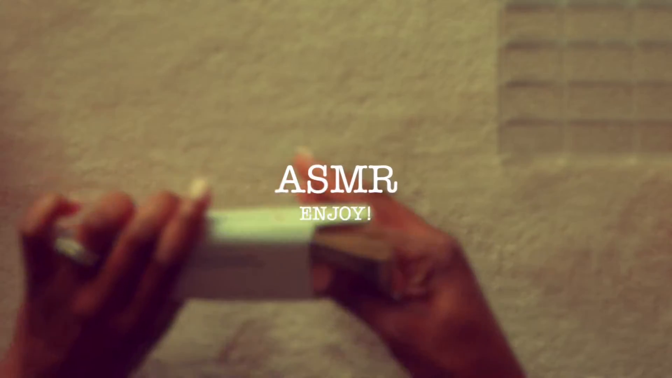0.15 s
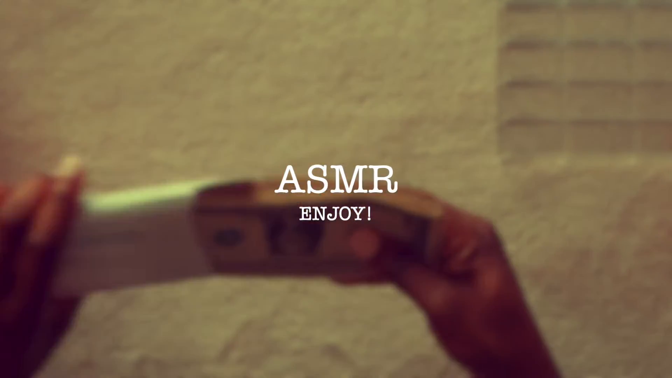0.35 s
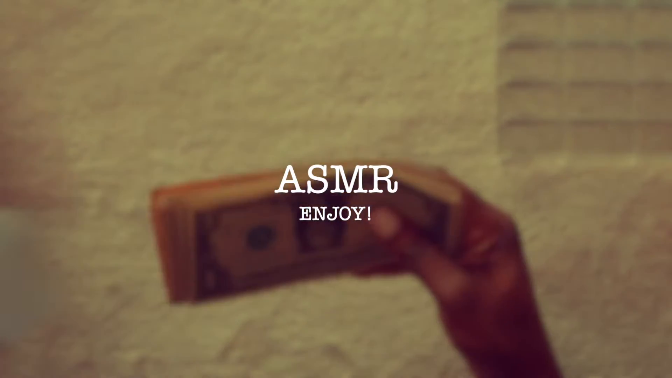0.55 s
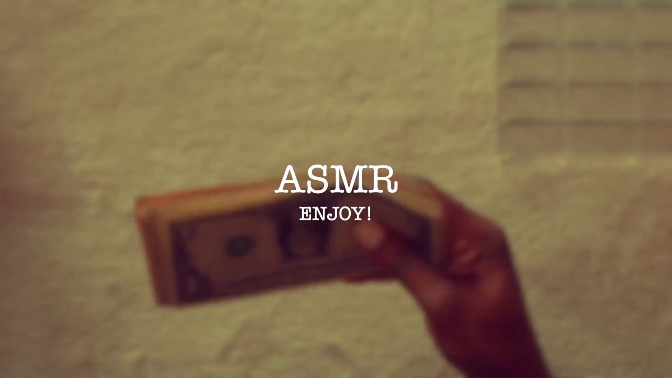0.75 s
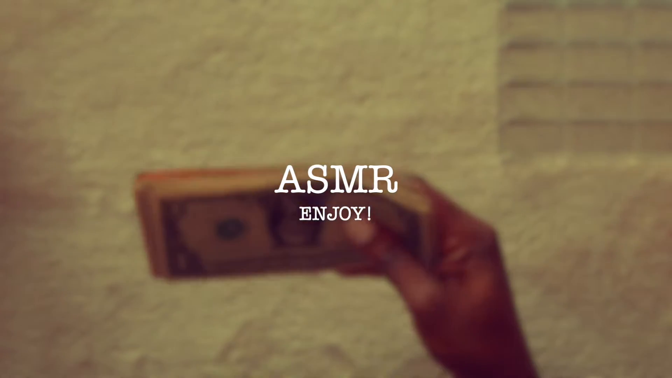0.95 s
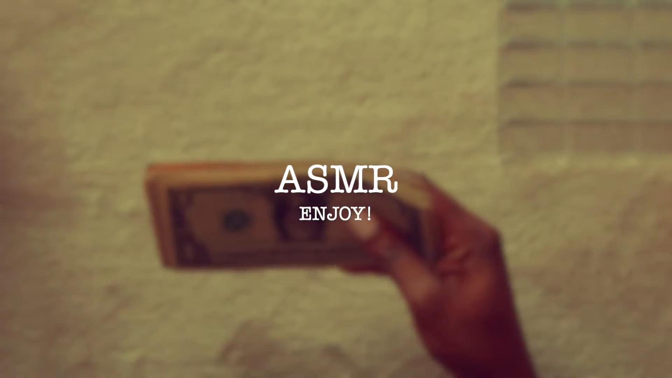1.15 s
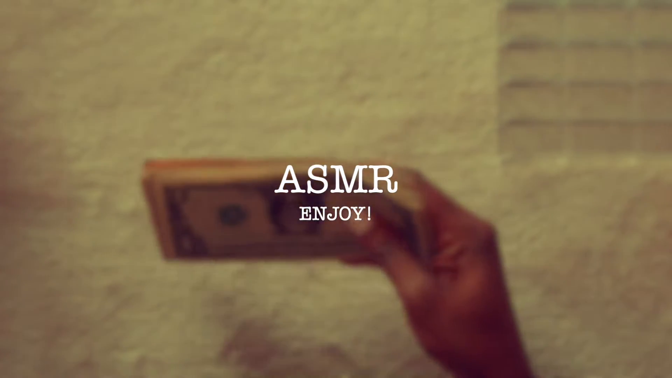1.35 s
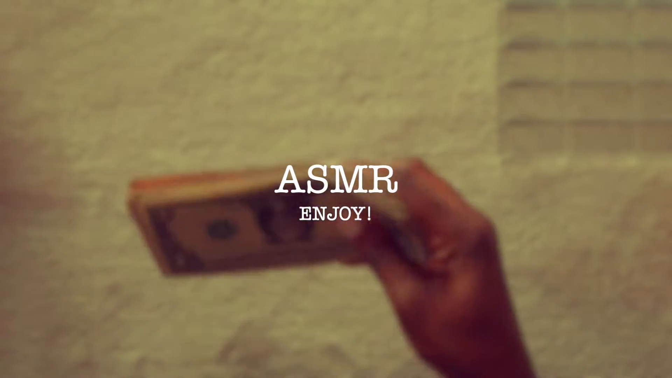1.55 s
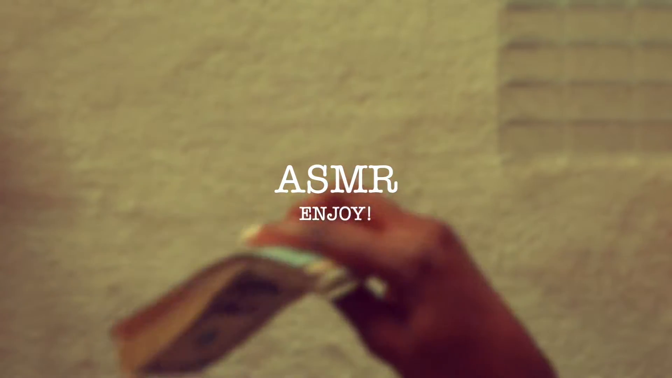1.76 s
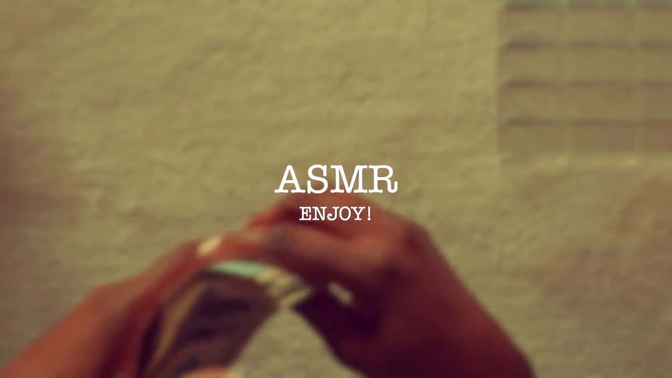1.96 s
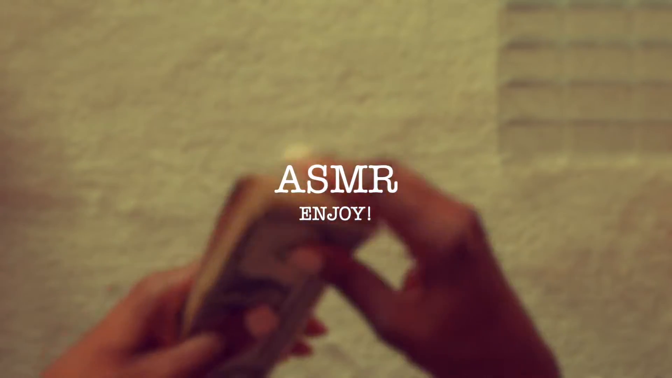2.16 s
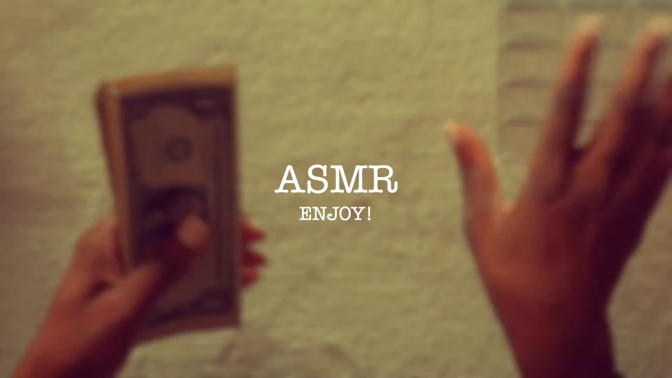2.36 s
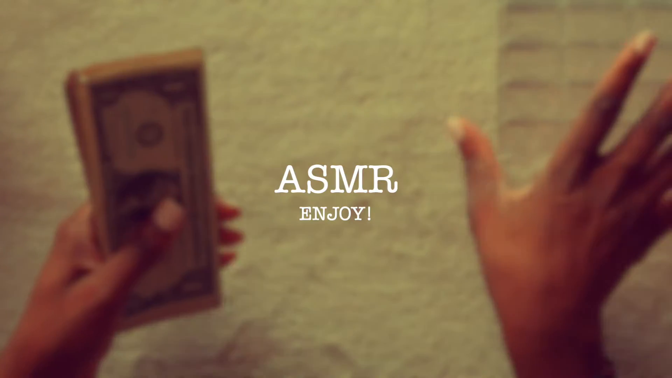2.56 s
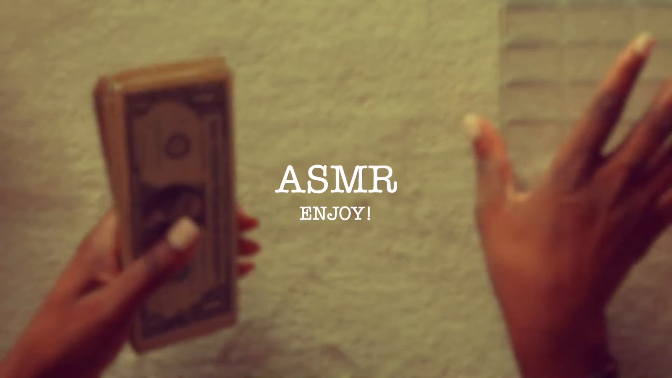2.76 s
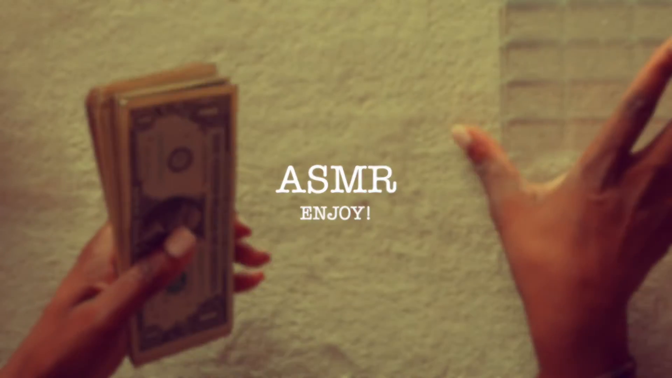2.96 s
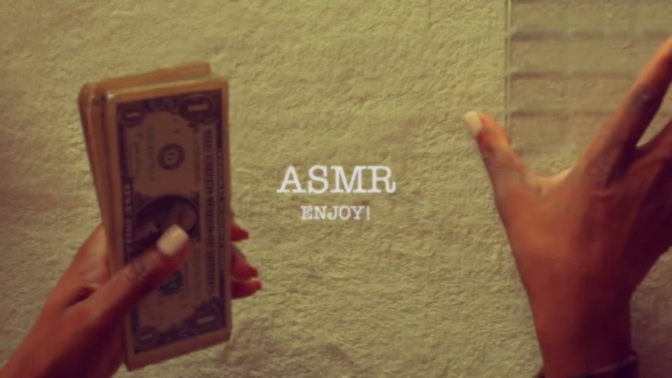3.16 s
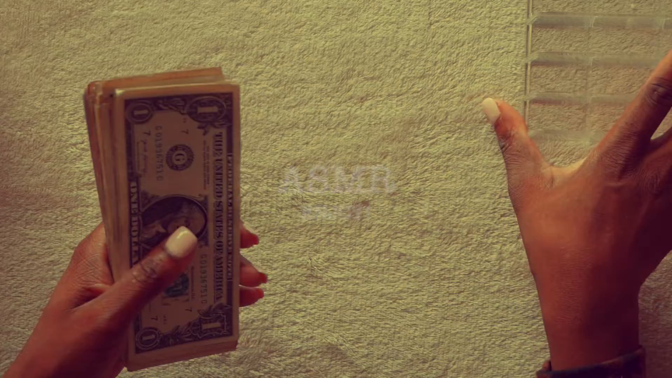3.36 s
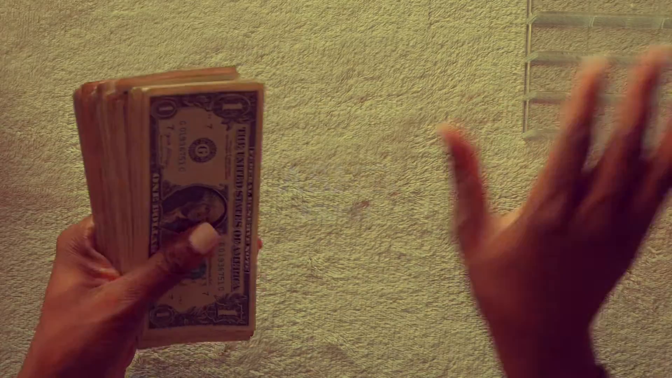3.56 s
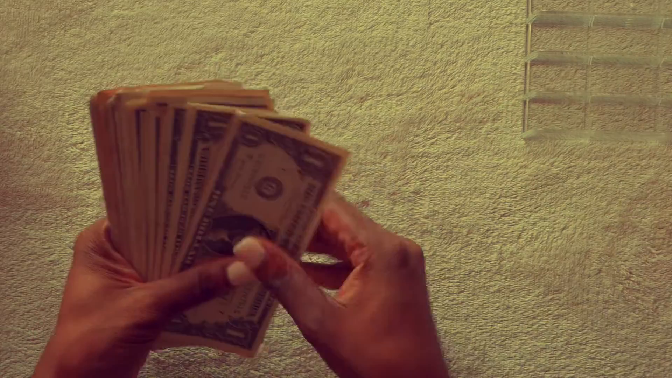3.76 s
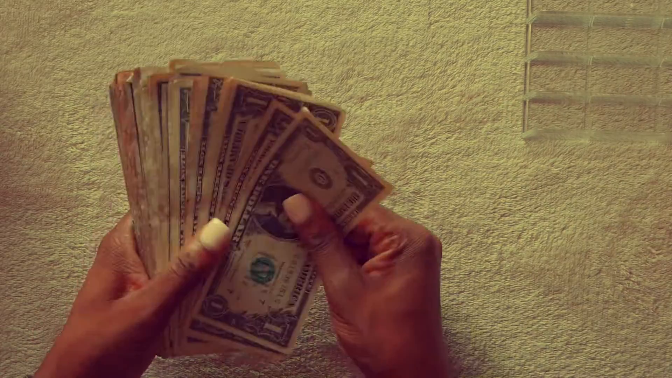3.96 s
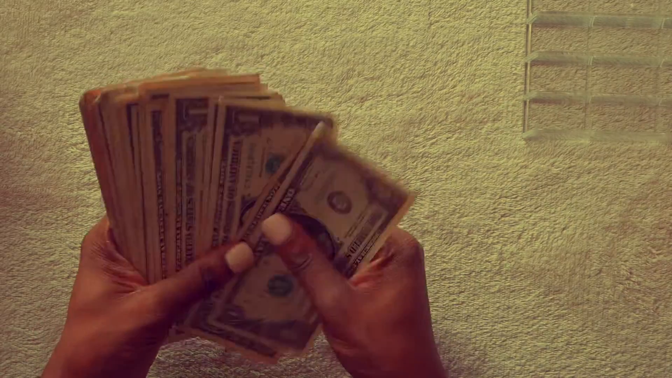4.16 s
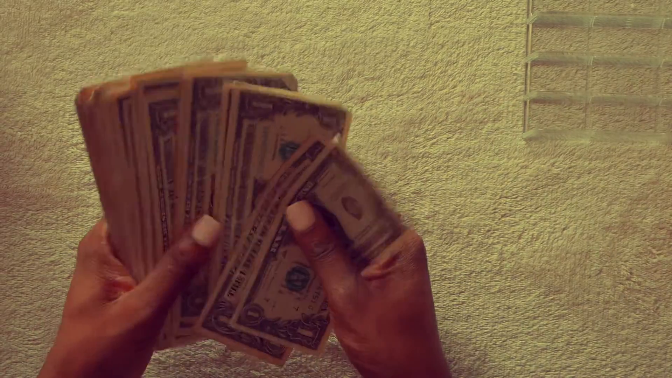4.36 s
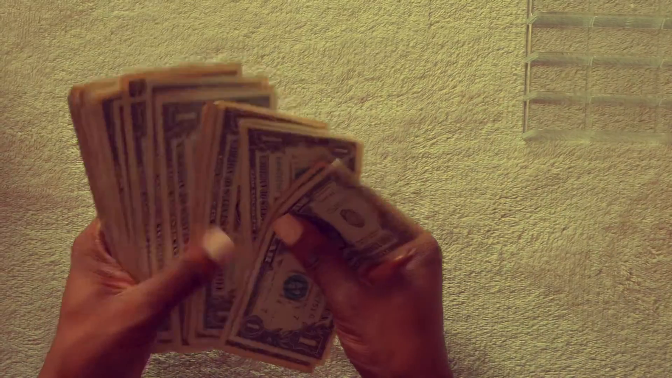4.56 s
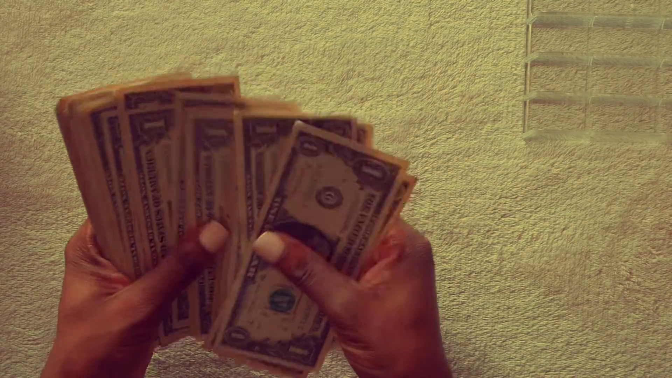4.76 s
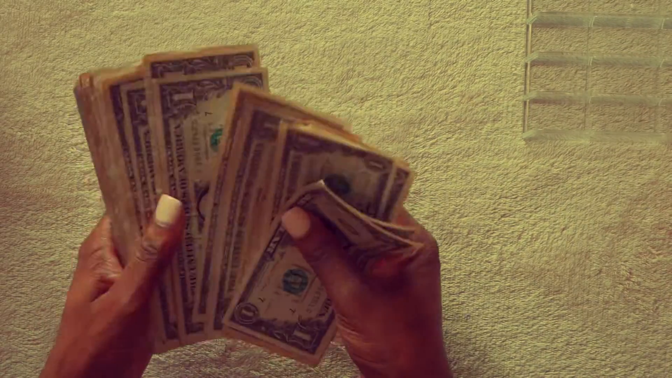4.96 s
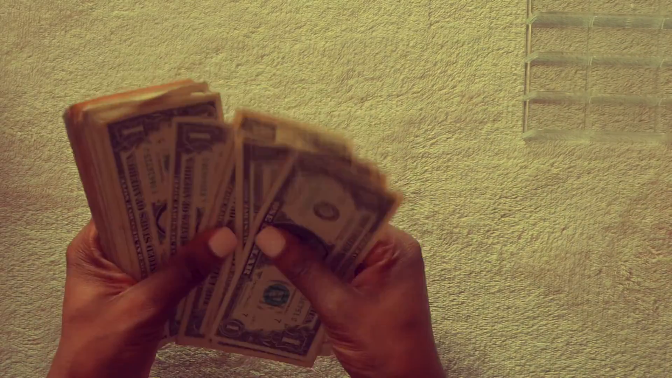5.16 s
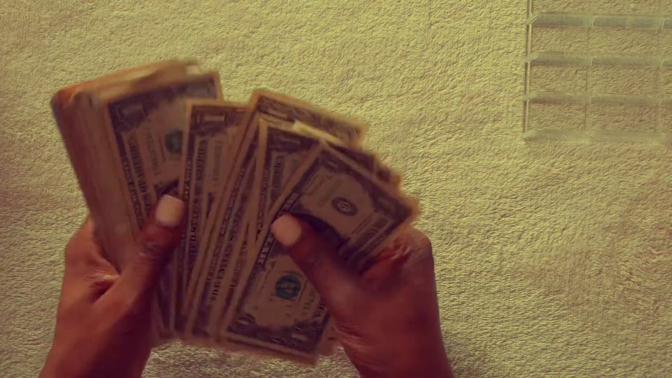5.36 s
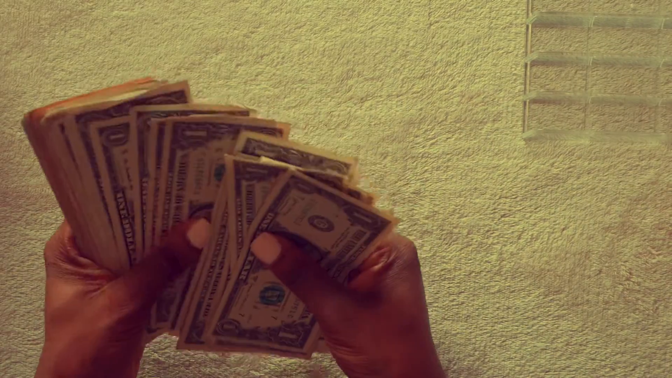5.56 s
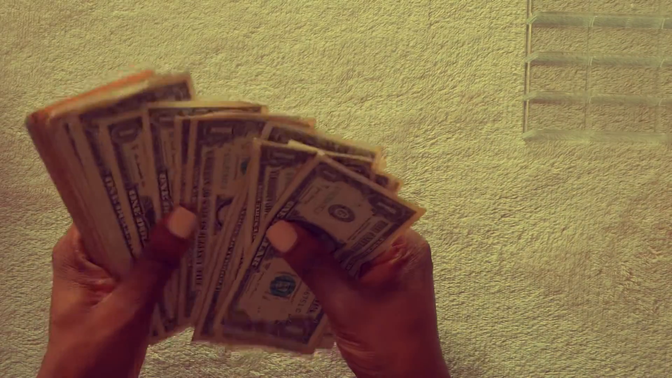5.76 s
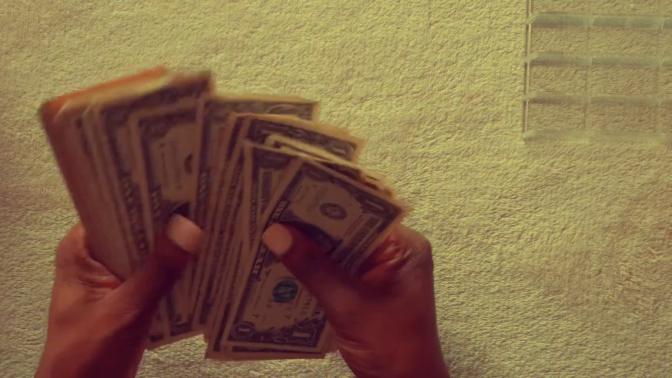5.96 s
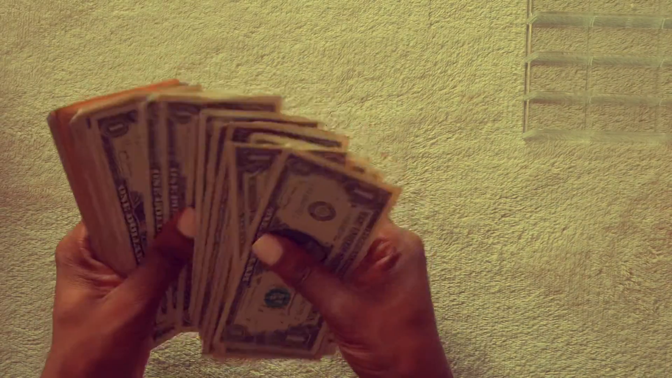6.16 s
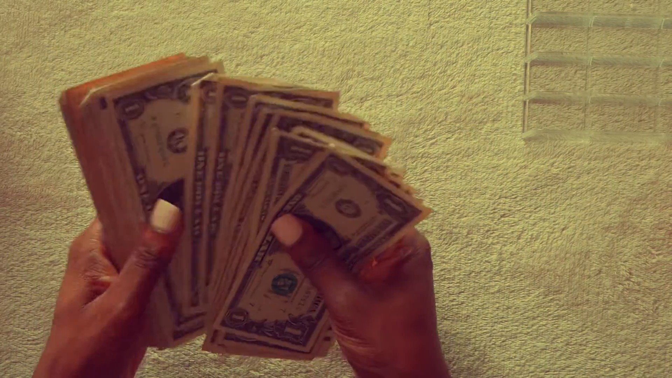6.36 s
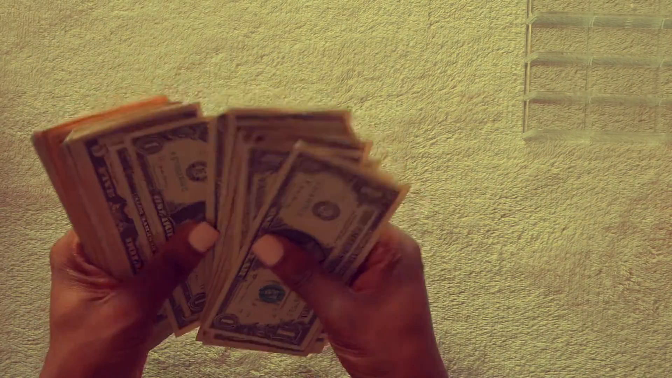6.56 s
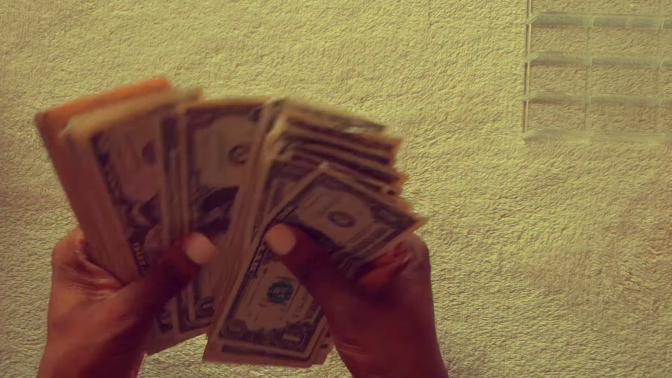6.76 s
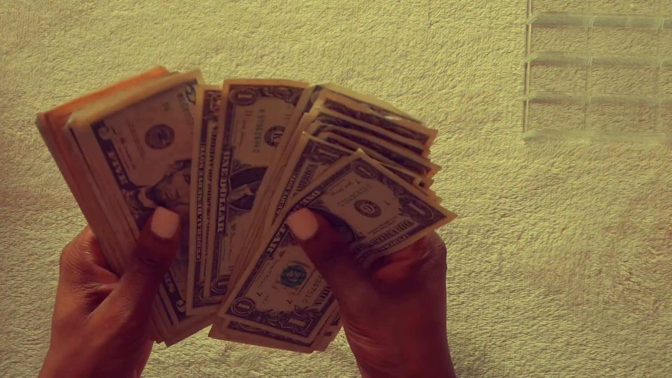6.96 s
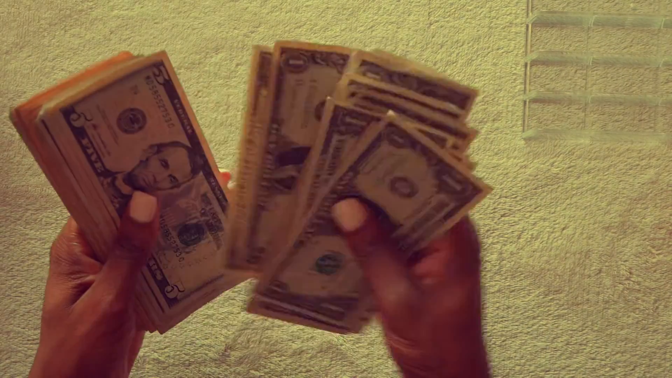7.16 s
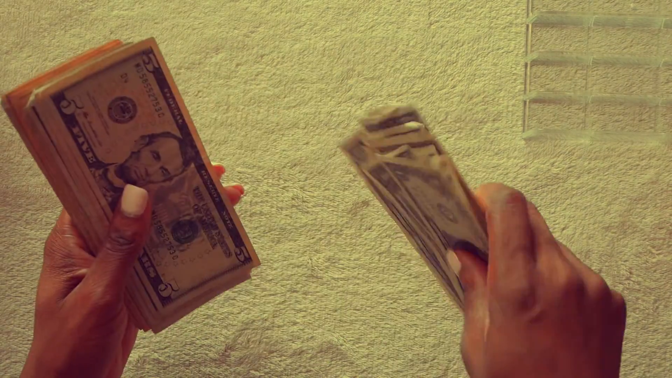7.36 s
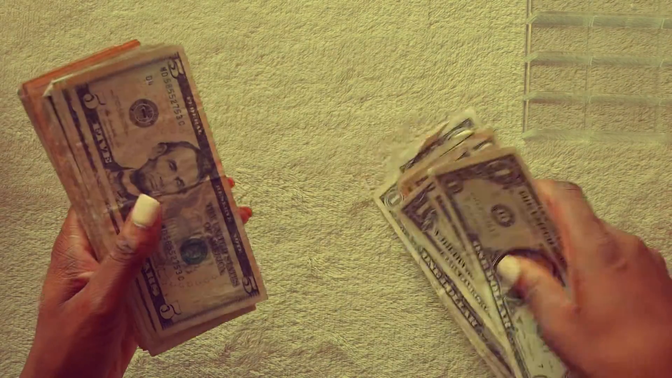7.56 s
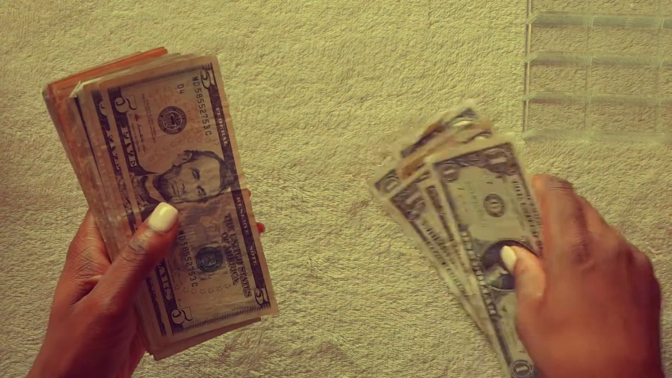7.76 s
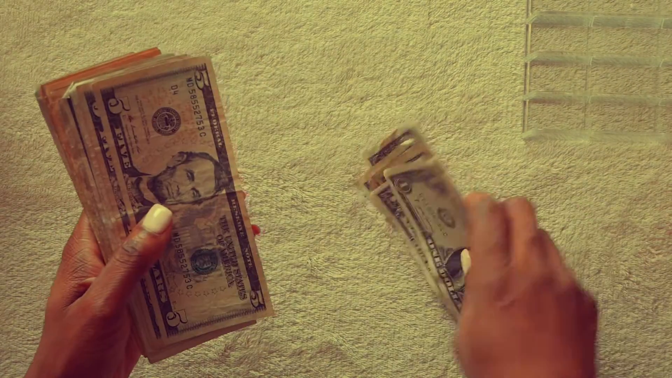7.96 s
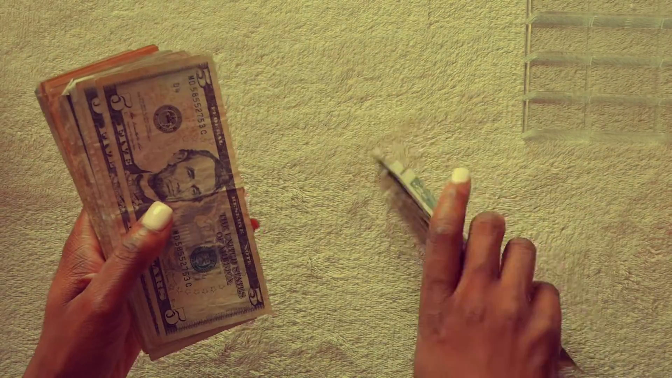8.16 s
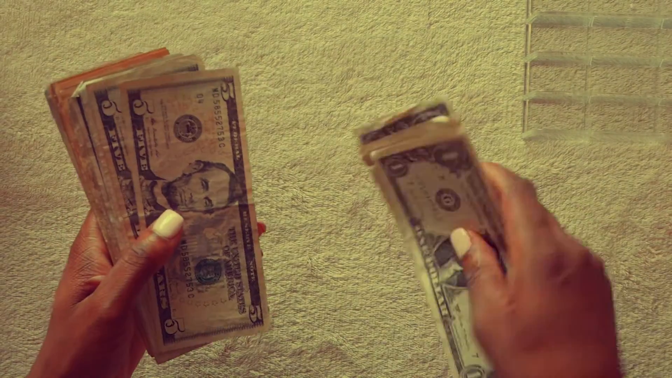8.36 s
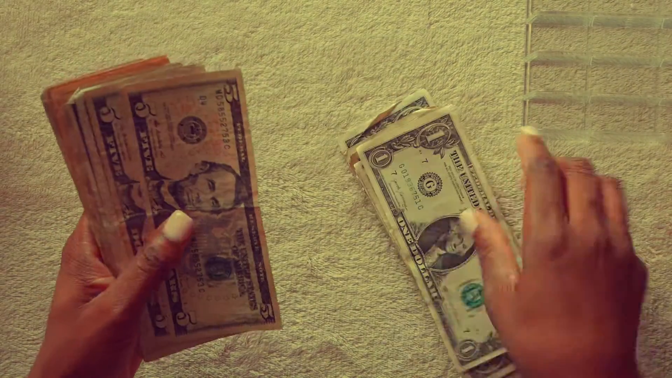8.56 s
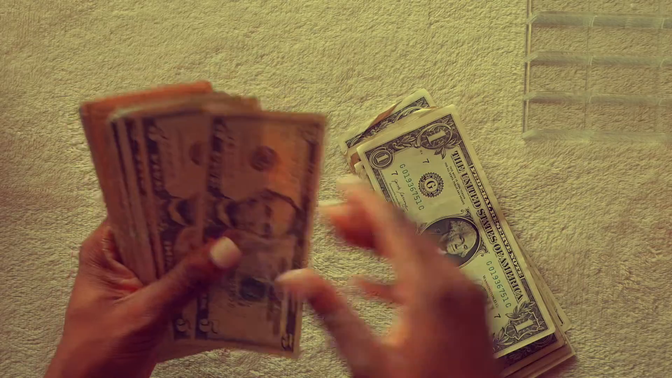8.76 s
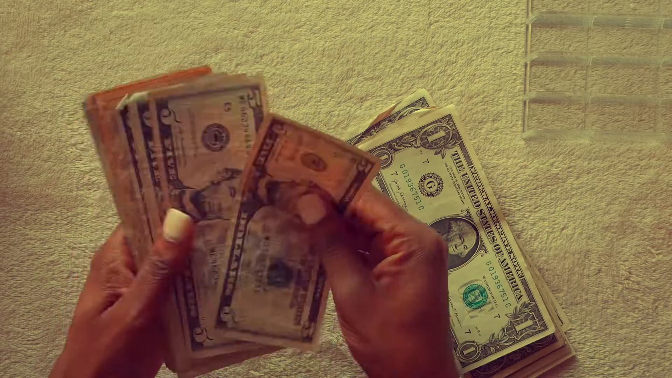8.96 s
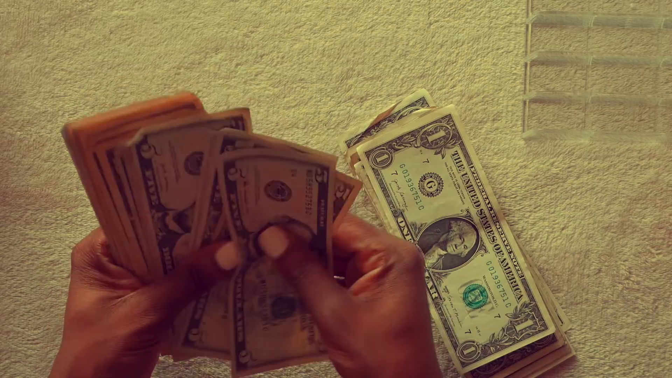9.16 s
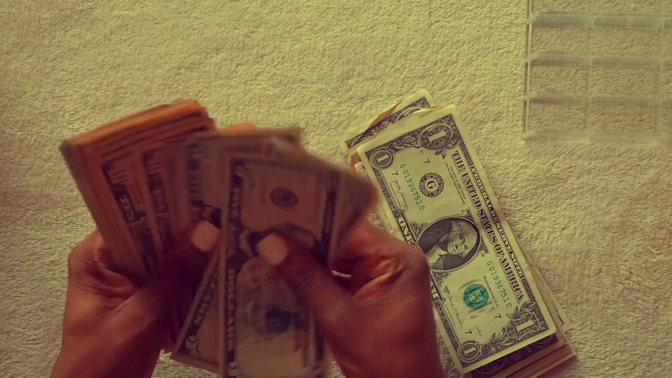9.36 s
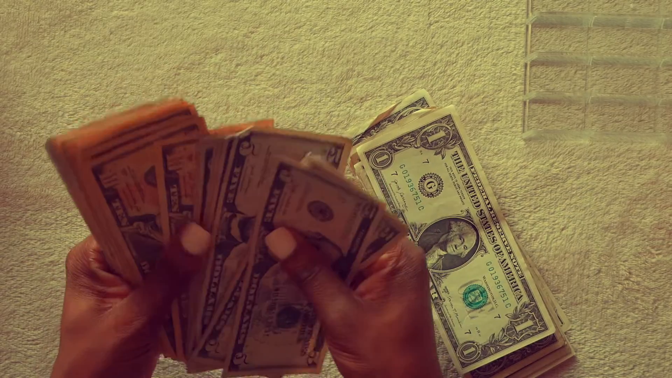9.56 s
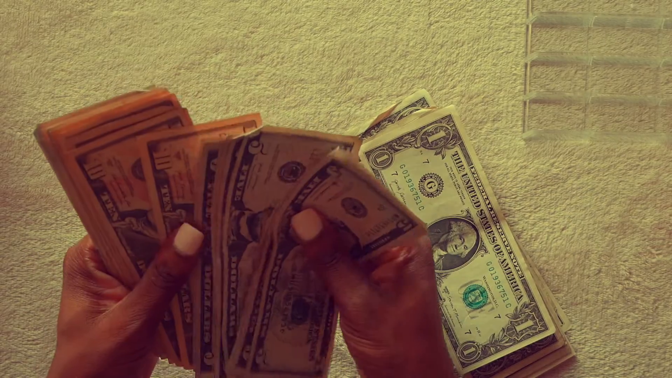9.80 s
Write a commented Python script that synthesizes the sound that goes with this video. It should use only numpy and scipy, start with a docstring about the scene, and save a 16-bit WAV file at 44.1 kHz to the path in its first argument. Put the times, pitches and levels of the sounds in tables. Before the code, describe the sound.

Extremely close, dry handling of paper money, the same in both channels, over a faint low room hum. From 0 to 0.6 seconds, a wad is dragged from an envelope: a loud, bright, stuttering scrape, hard crackling snaps, soft thumps, and a hollow papery pop near 0.58. It falls away quickly; until 2 seconds only faint brushes remain. At 2.0-2.3 a gentle rustle and air push, then a few faint nail rattles and a cluster of tiny bright ticks at 2.6-3.0. From 3.9 to 6.9, notes are fanned and thumbed: irregular short swishes, fluttering sheets, crisp creases, a stronger snap at 5.7, muffled low taps. From 7 to 8.5 softer, sparser sliding with low air movement. At 8.63 a sharp, bright clack rattles the stiff edges, with a short room answer. From 8.9 to the end, brisker hissing strokes, snaps and breath-like air bumps.

```python
"""A wad of paper banknotes, pulled from an envelope, then fanned and thumbed close to a mono microphone.
Sliding sheets are stuttering filtered noise; creases snap as short noise bursts with a ring and a shove.
A nail rattles the wad's edge resonances, taps are sagging low tones, and moving paper pushes slow air
at the microphone. Snaps and clacks get a faint room answer; a quiet hum lies behind; loud peaks flatten."""
import sys
import numpy as np
from scipy import signal
from scipy.fft import rfft, irfft, next_fast_len
from scipy.io import wavfile
from scipy.ndimage import uniform_filter1d, map_coordinates

SR = 44100
rng = np.random.default_rng(int(sys.argv[2]) if len(sys.argv) > 2 else 0)


def generate_wav(signal):
    """Clip the signal to [-1, 1] and save it as 16-bit WAV at the path in sys.argv[1]."""
    frames = np.transpose(np.atleast_2d(signal))
    scaled = np.clip(frames, -1, 1) * 32767
    pcm = np.round(scaled).astype(np.int16)
    wavfile.write(sys.argv[1], SR, pcm)


N = 433503  # samples

# Steady contact between the sheets, first the pull from the envelope; levels before the layer trims.
# Each row: time in seconds, fine fibre hiss in dB, sheet rustle in dB, flap of whole sheets in dB.
STEADY_CONTACT = [(0, -30.5, -30.5, -34.5), (.12, -27, -21, -38.5), (.267, -11, -13.5, -38.5),
                  (.561, -23.5, -25, -30.5), (.662, -45, -37, -54), (.73, -62, -51, -53),
                  (1.31, -79, -60.5, -51), (1.7, -53.5, -51, -54.5), (1.97, -60, -77.5, -52),
                  (2.3, -62, -60, -51.5), (2.57, -66, -58.5, -53), (3.25, -67.5, -67, -57),
                  (3.46, -59.5, -61, -58), (4.05, -41.5, -43.5, -49), (4.7, -44.5, -45.5, -54),
                  (5.05, -37.5, -37.5, -46), (5.4, -52, -49, -49), (5.65, -45, -44.5, -62),
                  (6.12, -50, -43.5, -61), (7.0, -64, -56.5, -54.5), (7.7, -50.5, -47.5, -65),
                  (8.14, -52, -45.5, -47), (8.5, -51.5, -49, -71), (8.87, -52, -54, -66),
                  (9.1, -32, -37, -47), (9.34, -45, -42.5, -50), (9.83, -39.5, -42.5, -53)]
# Single strokes of one sheet over the next; levels before the layer trims.
# Each row: peak time in seconds, length in seconds, hiss in dB, rustle in dB, flap in dB.
SHEET_STROKES = [(0.069, 0.13, -37.5, -17.5, -21), (0.166, 0.091, -23, -9.5, -14.5),
                 (0.214, .12, -11, -9, -23), (0.594, 0.065, -36, -21, -18.5),
                 (0.808, 0.26, -47.5, -38.5, -49), (0.866, 0.19, -49, -37, -47),
                 (1.233, 0.098, -65.5, -30, -40), (1.607, 0.07, -51, -32.5, -34),
                 (2.027, 0.077, -26, -30.5, -36.5), (2.107, 0.25, -32, -38.5, -39.5),
                 (2.232, 0.12, -30.5, -36.5, -42), (2.785, 0.18, -42, -41.5, -47.5),
                 (2.94, 0.19, -51.5, -42.5, -54), (3.04, .05, -42, -36.5, -49),
                 (3.108, 0.13, -50.5, -48, -56), (3.393, 0.18, -55.5, -52.5, -60),
                 (3.52, 0.14, -43, -51, -62), (3.547, 0.21, -45.5, -39, -53),
                 (3.878, 0.066, -41.5, -38, -34), (3.953, .2, -30.5, -37, -39.5),
                 (4.141, 0.23, -27.5, -30, -37), (4.207, 0.12, -37.5, -30.5, -31),
                 (4.26, 0.081, -31.5, -25.5, -25.5), (4.349, .13, -34, -27.5, -29.5),
                 (4.454, 0.15, -26.5, -29, -38), (4.63, 0.2, -32.5, -34, -36),
                 (4.78, 0.15, -29.5, -32.5, -38.5), (4.836, .1, -23.5, -30, -48),
                 (4.933, .3, -34, -39.5, -49.5), (5.12, 0.18, -31.5, -36, -54),
                 (5.179, 0.34, -31, -34.5, -52), (5.37, .15, -42.5, -49, -55),
                 (5.454, 0.056, -36, -29.5, -28.5), (5.505, 0.45, -34.5, -35, -42.5),
                 (5.61, .2, -40.5, -37, -56), (5.696, 0.15, -34, -34, -37), (5.87, .4, -34.5, -40, -44),
                 (5.997, 0.075, -36.5, -32, -37), (6.071, 0.093, -34.5, -37.5, -54),
                 (6.17, 0.054, -31, -33, -44), (6.215, 0.26, -30.5, -30, -33.5),
                 (6.322, 0.061, -43, -35, -29.5), (6.383, 0.28, -33, -35.5, -41),
                 (6.552, .2, -32.5, -36.5, -46), (6.638, 0.12, -25.5, -29, -43),
                 (6.754, 0.06, -31, -31.5, -29.5), (6.84, .35, -39.5, -44, -51),
                 (7.162, 0.32, -39, -43, -54.5), (7.385, 0.089, -36, -39, -62),
                 (7.459, 0.067, -41, -42.5, -60), (7.585, 0.29, -50, -45, -69),
                 (7.753, 0.11, -45.5, -38.5, -42), (7.866, 0.35, -47, -37.5, -44.5),
                 (8.003, 0.23, -46, -38.5, -46.5), (8.092, 0.094, -54, -39.5, -42),
                 (8.208, 0.19, -37, -30.5, -43.5), (8.291, .16, -38.5, -33.5, -34),
                 (8.401, 0.16, -39.5, -31.5, -40), (8.455, 0.067, -44, -38.5, -55),
                 (8.64, 0.13, -32, -31.5, -38.5), (8.911, 0.029, -35, -29.5, -31.5),
                 (8.956, 0.1, -25.5, -30.5, -32.5), (9.087, 0.072, -25, -32.5, -42.5),
                 (9.162, 0.19, -26.5, -37.5, -33), (9.267, .15, -26, -32.5, -34.5),
                 (9.401, 0.12, -27.5, -31.5, -43), (9.44, 0.17, -20.5, -29, -39.5),
                 (9.5, .08, -30, -38, -48), (9.643, 0.14, -35, -38, -46)]
# Colour of rubbing fibres, also the treble of a snap. Each row: frequency in Hz, relative density in dB per Hz.
FIBRE_COLOUR = [(3500, -11.5), (6300, -11), (9000, 0), (12000, 0.5), (14500, -5.5), (16000, -19.5)]
# Colour of sliding sheets. Each row: frequency in Hz, relative density in dB per Hz.
SHEET_COLOUR = [(350, -50.5), (800, 1), (1400, 2), (2500, 7.5), (4500, 5), (6500, 2), (10000, -6)]
# Colour of whole sheets flapping. Each row: frequency in Hz, relative density in dB per Hz.
FLAP_COLOUR = [(80, -15.5), (150, -4.5), (450, -2), (900, 0), (1400, -2), (2500, -45.5)]
# The empty envelope is laid aside: start in seconds, end in seconds.
EMPTY_ENVELOPE_SPAN = (0.55, 1.9)
# Resonances of the hollow envelope. Each row: centre in Hz, width in Hz, level in dB for one pass.
ENVELOPE_MODES = [(1350, 170, 2.5), (1720, 260, 2.5), (2550, 700, -0.5), (3530, 700, -1), (4420, 940, -3)]
# Crease snaps. Each row: time in seconds, relative ring level in dB, relative treble level in dB,
# ring of the buckling patch in Hz, nominal length in ms.
CREASE_SNAPS = [(0.0474, -33.5, -6.5, 2900, 0.83), (.077, -11.5, -24, 1375, 6.9),
                (.1155, -11.5, -29.5, 2330, 1.6), (0.1356, -13, -26.5, 2080, 2.5),
                (0.1469, -8.5, -13, 3300, .94), (0.1585, -3.5, -10, 1430, 4.8),
                (0.169, -1.5, -23.5, 1660, 4.5), (0.2201, -11, -24, 1770, 8.6),
                (0.2309, 4, -25.5, 2900, 3.7), (0.4861, -11.5, -18.5, 1166, 6.2),
                (.525, -27, -13, 1930, 2.5), (0.5776, -6.5, -10, 2300, 14), (0.8724, -30, -56, 1270, 4.1),
                (1.2257, -26, -59, 1580, 3.2), (1.795, -45.5, -50, 2500, 1.5),
                (1.8355, -40, -33, 1420, 1.9), (2.1194, -32.5, -23.5, 2230, 2.3),
                (2.18, -31.5, -42, 1890, 1.9), (2.349, -24, -19, 3960, 1.5),
                (2.6233, -20, -15.5, 3050, 0.42), (2.6322, -25, -38, 6200, 4),
                (2.7201, -31, -37.5, 5730, 2.6), (2.747, -31, -39, 4200, 1.7),
                (2.7708, -20, -21, 3640, 5.6), (2.778, -20, -34.5, 6400, 1.8),
                (2.8117, -9.5, -16.5, 4640, 4.4), (2.851, -26, -40.5, 2150, 4),
                (2.9173, -30.5, -33.5, 4290, 1.3), (2.937, -18, -21, 3760, 1.7),
                (2.96, -18.5, -20.5, 4100, 1.7), (2.97, -31, -45.5, 4050, 1.9),
                (2.9747, -27.5, -45, 2650, 1.3), (3.14, -43, -55, 2500, 4.9),
                (3.425, -48.5, -41, 4000, 2.2), (3.6584, -26.5, -23.5, 3010, 0.54),
                (3.7532, -38, -50, 1690, 2.3), (3.8652, -20, -18.5, 2960, 1.07),
                (3.8963, -29.5, -46.5, 1230, 3.82), (4.1162, -22, -35, 2620, .91),
                (4.119, -19.5, -33.5, 2780, 4.1), (4.1337, -15.5, -36, 2480, 2.1),
                (4.165, -22, -20.5, 2340, 2.3), (4.2341, -16, -28, 2310, 1.3),
                (4.2514, -18, -19, 3930, 2.8), (4.2561, -9, -15, 3760, 3.1), (4.269, -19, -41, 2600, 1.2),
                (4.337, -29, -42, 1390, 11), (4.465, -16, -31, 2880, 1), (4.474, -20, -22, 3890, 3),
                (4.5732, -21.5, -44, 4330, 3.7), (4.634, -32, -24, 4460, 3.1),
                (4.6512, -16.5, -16.5, 3070, 3.4), (4.6848, -19.5, -29.5, 3950, 1.7),
                (4.7225, -28, -36, 3820, 1.8), (4.8324, -17.5, -21.5, 4470, 2.2),
                (4.837, -24, -22.5, 4020, 8.6), (4.9117, -26, -40, 4320, 4.2),
                (5.2405, -13.5, -18, 3980, 0.29), (5.2487, -30, -26, 3230, 3.9),
                (5.29, -38, -36, 2690, 1.7), (5.3032, -35, -38, 3880, 5.7),
                (5.325, -26.5, -20.5, 2090, 1.45), (5.3469, -25, -35, 3680, 2.6),
                (5.6913, -8.5, -5.5, 5430, 3.7), (5.735, -28.5, -31, 4230, 3.8),
                (5.852, -21.5, -36, 2240, 1.4), (5.9982, -29, -28, 2460, 2.2),
                (6.0668, -24.5, -39, 2860, 3.2), (6.1221, -31, -45, 3740, 2.3),
                (6.16, -26.5, -31, 3600, 1.7), (6.2112, -11, -22, 3030, 1.8),
                (6.2624, -29, -37.5, 1830, 2.3), (6.327, -22, -33, 2220, 1.9),
                (6.3428, -28, -27, 2680, 1.5), (6.3514, -26, -25, 1140, 3.6),
                (6.3853, -16, -11.5, 4330, 2.7), (6.4856, -22.5, -18.5, 3750, 0.69),
                (6.494, -15.5, -44, 2030, 0.51), (6.5572, -29.5, -16, 4740, 1.9),
                (6.688, -17, -19, 3800, 3.5), (6.7484, -21.5, -14.5, 2840, 4.5),
                (6.8723, -35.5, -35.5, 1450, 3.1), (7.016, -34, -67, 1840, 2.4),
                (7.0547, -36.5, -41, 3760, 1.7), (7.255, -25, -34, 2780, 1.9),
                (7.875, -25.5, -50, 3420, 3.2), (8.145, -34, -51, 1350, 2.3),
                (8.274, -22.5, -41, 4800, 6.4), (8.3154, -25, -44, 4370, 1.2),
                (8.323, -26.5, -29, 3620, 12), (8.5257, -35.5, -33.5, 2660, 5.1),
                (8.6042, -36.5, -35, 4370, 2.7), (8.793, -29, -32, 2770, 3.9), (8.817, -29, -27, 5420, 1.4),
                (8.878, -18.5, -16.5, 3840, 1.2), (8.892, -18, -13.5, 4300, 1.9),
                (8.897, -22.5, -17.5, 3950, 6), (8.9292, -24.5, -24.5, 1670, 1.1),
                (8.96, -27.5, -16.5, 3500, 1.2), (9.045, -29, -39, 2670, 4), (9.077, -41, -16.5, 3370, 0.8),
                (9.081, -27, -23, 2960, 6.7), (9.211, -23, -36, 2350, 1.1), (9.2857, -20.5, -26, 2530, 5.7),
                (9.294, -21, -10, 2640, 1.7), (9.322, -33, -42, 2600, 1.5), (9.3572, -30, -41, 2120, 2.8),
                (9.3957, -18.5, -19, 4130, 5.6), (9.4125, -32, -17.5, 2690, 0.81),
                (9.421, -25.5, -19.5, 3570, 0.86), (9.553, -10, -22.5, 3130, 0.53),
                (9.6438, -26, -17, 3800, 5.1), (9.6603, -29.5, -27, 2990, 2.1),
                (9.6985, -24, -43.5, 1840, 0.88)]
# A nail on the edge. Each row: start in seconds, level in dB, rise in seconds, t60 in seconds,
# dullness in dB per octave for one pass.
NAIL_CLACKS = [(2.502, -47, 0.004, 0.03, 6), (2.535, -48, 0.02, 0.04, 7), (2.577, -30.5, 0.025, 0.034, 4),
               (3.021, -35.5, 0.018, 0.023, 10), (8.6293, -2.5, 0.00077, 0.025, -1.5)]
# Resonances of the wad's stiff edge. Each row: centre in Hz, width in Hz, level in dB for one pass.
EDGE_MODES = [(2400, 120, -6.5), (2890, 82, -1.5), (3490, 190, -1), (3990, 160, 0.5), (4520, 260, -0.5),
              (5110, 270, -1.5), (5830, 250, 1.5), (6870, 380, -2.5), (7300, 280, -3.5), (8470, 300, -6.5),
              (9280, 250, -2.5), (10200, 400, -7), (11220, 460, -6), (13700, 400, -11)]
# Soft taps of the wad. Each row: start in seconds, relative level in dB, nominal pitch in Hz, t60 in seconds.
SOFT_TAPS = [(0.07, -19, 139.5, 0.053), (0.165, -5, 231, 0.027), (0.224, -25.5, 243.5, 0.047),
             (0.573, -53, 280, 0.07), (2.02, -26, 101.7, 0.042), (4.25, -31, 115, 0.076),
             (4.334, -29, 102.5, 0.067), (4.47, -33, 105, 0.07), (5.449, -42, 113, 0.054),
             (5.689, -13, 301, 0.017), (6.201, -31, 134, 0.043), (6.386, -20, 105, 0.039),
             (7.962, -26, 129, 0.12), (8.203, -20, 130.6, 0.14), (8.634, -23.5, 103.6, 0.15),
             (8.641, -29, 260, 0.12), (9.285, -19.5, 136, 0.053), (9.529, -41, 101, 0.07)]
# Air pushed at the microphone. Each row: time in seconds, level in dB.
AIR_LEVEL = [(0, -37.5), (.8, -37), (1.9, -35.5), (2.1, -25.5), (2.45, -32.5), (3.28, -34.5), (3.9, -30),
             (4.9, -28), (5.3, -24.5), (5.97, -31.5), (6.3, -27.5), (7.17, -34.5), (7.4, -32.5),
             (8.2, -26.5), (8.8, -34.5), (9.17, -21.5), (9.33, -29), (9.47, -21.5), (9.75, -32.5)]
# Colour of that air. Each row: frequency in Hz, relative density in dB per Hz.
AIR_COLOUR = [(1.8, -35.5), (3, 8), (17, -3.5), (60, -14.5), (100, -23.5), (200, -29.5), (350, -45),
              (600, -71)]
# Decay of the room. Each row: frequency in Hz, t60 in seconds.
ROOM_DECAY = [(300, 0.22), (1500, 0.08), (5000, .09), (14000, 0.088)]
# Colour of the quiet room. Each row: frequency in Hz, relative density in dB per Hz.
ROOM_COLOUR = [(60, -35.5), (115, 0), (190, -17), (255, -6.5), (340, -10), (470, -15.5), (640, -12.5),
               (705, -7.5), (770, -15), (1300, -23.5), (2100, -27), (5000, -32), (10500, -33.5),
               (16000, -47.5)]

RISE_SHARE, EDGE_DB = 0.43, 24  # part of a stroke before its peak; its ends lie this far below the peak
ROUNDNESS = 1.32  # 1 = pointed swell, more = it holds its level and ends abruptly
SMALL_COUNT = 100
SMALL_RING_DB, SMALL_TREBLE_DB, SMALL_SPREAD_DB = 7.5, 1.5, 2.5  # over the rustle and hiss; random spread
SMALL_HZ, SMALL_MS, SMALL_SCATTER = 3000, 1.6, .45  # typical ring and length of small snaps, log scatter
TOP_HZ = 16000  # band limit


def slide():
    """Rubbing fibres hiss; the drag stutters, and rough spots catch, fine and coarse ones apart."""
    hiss_db, rustle_db, flap_db = rubbing()
    unsteadiness = np.clip(-hiss_db / 30, .3, 1)  # a loud slide stutters less
    drag = unsteadiness * (wobble(40) + 1.56 * wobble(110))
    fine = catches(per_s=150, spread_db=5.5, t60=0.0049)
    coarse = unsteadiness * catches(per_s=77, spread_db=5, t60=0.022)

    hiss = amp(0.75 * drag) * (1 + 0.2 * fine) * coloured(patchy(depth_db=2.0), FIBRE_COLOUR)
    rustle = amp(0.71 * drag) * (1 + 0.28 * coarse) * sheet_noise()
    lumps = amp(1.3 * drag + .6 * wobble(10)) * (1 + .35 * coarse)
    flap = lumps * coloured(patchy(depth_db=1.5), FLAP_COLOUR)
    return amp(hiss_db - 1.3) * hiss + amp(rustle_db - 1.58) * rustle + amp(flap_db - 3.5) * flap


def sheet_noise():
    """Noise of sliding sheets; the hollow envelope's resonances dominate while it is laid aside."""
    sheets = coloured(patchy(depth_db=2.5), SHEET_COLOUR)
    empty = slice(*(round(s * SR) for s in EMPTY_ENVELOPE_SPAN))
    noise = rng.standard_normal(N)[empty]
    hollow = resonant(resonant(noise, ENVELOPE_MODES), ENVELOPE_MODES)
    sheets[empty] = unit(.4 * sheets[empty] + hollow)
    return sheets


def rubbing():
    """Hiss, rustle and flap levels in dB: each stroke swells and fades over the steady contact."""
    t = np.arange(0, N, 64) / SR  # a coarse time grid is enough
    peak, length, *levels = np.transpose(SHEET_STROKES)
    late = (t - peak[:, None]) / length[:, None]
    distance = np.maximum(-late / RISE_SHARE, late / (1 - RISE_SHARE))
    swell = amp(-2 * EDGE_DB * distance ** ROUNDNESS)  # doubled dB give power
    strokes = [np.interp(np.arange(N) / SR, t, amp(2 * db) @ swell) for db in levels]
    return [10 * np.log10(amp(2 * bed) + power) for bed, power in zip(curves(STEADY_CONTACT), strokes)]


def catches(per_s, spread_db, t60):
    """Envelope of tiny random catches: sudden, short, a few much larger than the rest."""
    sizes = amp(spread_db * np.minimum(rng.exponential(size=N), 4))
    kicks = (rng.random(N) < per_s / SR) * sizes
    decay = amp(-60 * np.arange(SR // 20) / SR / t60)
    return unit(signal.fftconvolve(kicks, decay)[:N])


def patchy(depth_db):
    """Noise whose colour drifts in patches as the sheets bend."""
    z = signal.stft(rng.standard_normal(N), nperseg=256)[2]
    field = uniform_filter1d(rng.standard_normal(z.shape), size=5, axis=0)  # smooth over frequency
    field = uniform_filter1d(field, size=9, axis=1)  # and over time
    return signal.istft(z * amp(depth_db * field / field.std()), nperseg=256)[1][:N]


def snaps():
    """A crease buckles in a few ms; fast bending waves bring treble first, then the patch rings and shoves air."""
    out, t = np.zeros(N + SR), np.arange(2048) / SR
    for s, ring_db, treble_db, ring_hz, ms in CREASE_SNAPS + small_snaps():
        length = ms / 1000
        start = round((s - .25 * length) * SR)
        patch = [(ring_hz / 4, -26), (ring_hz / 2.32, -7), (ring_hz, 0),
                 (ring_hz * 1.64, -6), (ring_hz * 4, -24), (ring_hz * 12, -50)]
        # lag and stretch are in snap lengths
        for spectrum, db, lag, stretch in ((FIBRE_COLOUR, treble_db, -.15, .17), (patch, ring_db, -.05, .19)):
            u = np.maximum(t / length - .25 - lag, 0) / stretch
            burst = u ** 2 * np.exp(-u) * coloured(rng.standard_normal(len(t)), spectrum)
            burst *= np.sqrt(length * SR / np.sum(burst ** 2))  # energy follows the length
            out[start:][:len(t)] += amp(db - 0.87) * burst
        u = t / (0.00078 + 0.33 * length)
        shove = rng.standard_normal() * u * (2 - u) * np.exp(-u)  # a push and pull of random sign and size
        out[start:][:len(t)] += amp(ring_db - 10.5) * shove
    return out[:N]


def small_snaps():
    """Rows like those of CREASE_SNAPS, at random moments after the envelope, following the rubbing level."""
    hiss_db, rustle_db, _ = rubbing()
    at = rng.integers(round(EMPTY_ENVELOPE_SPAN[1] * SR), N, SMALL_COUNT)
    chance = rng.standard_normal((4, SMALL_COUNT))
    ring_db = rustle_db[at] + SMALL_RING_DB + SMALL_SPREAD_DB * chance[0]
    treble_db = hiss_db[at] + SMALL_TREBLE_DB + SMALL_SPREAD_DB * chance[1]
    sizes = np.exp(SMALL_SCATTER * chance[2:])
    return list(zip(at / SR, ring_db, treble_db, SMALL_HZ * sizes[0], SMALL_MS * sizes[1]))


def clacks():
    """A nail flicks or scrapes the stacked edges: a dying rattle in their resonances."""
    out, t = np.zeros(N + SR), np.arange(8192) / SR
    for s, db, rise, t60, dull_db in NAIL_CLACKS:
        modes = [(hz, width, level - dull_db * np.log2(hz / 4000)) for hz, width, level in EDGE_MODES]
        after = np.maximum(t - rise, 0)
        decay = amp(-60 * after / t60) + amp(-16.5 - 60 * after / 0.16)  # main decay and a faint longer tail
        shape = np.minimum(t / rise, 1) * decay
        rattle = resonant(resonant(shape * rng.standard_normal(len(t)), modes), modes)  # twice: deep valleys
        out[round(s * SR):][:len(t)] += amp(db) * rattle * np.std(shape)
    return out[:N]


def resonant(x, modes):
    """x through (Hz, width, dB) resonances of alternating sign, rms 1."""
    f = np.fft.rfftfreq(len(x), 1 / SR)
    ring = np.zeros(len(f), complex)
    for k, (centre, width, db) in enumerate(modes):
        damping = 1j * f * width
        ring += (-1) ** k * amp(db) * damping / (centre * centre - f * f + damping)
    return unit(irfft(rfft(x) * ring, len(x)))


def taps():
    """The wad or a hand thumps: a few low cycles that sag in pitch, inside a dull puff."""
    out, t = np.zeros(N + SR), np.arange(8192) / SR
    for s, db, hz, t60 in SOFT_TAPS:
        turns = hz * (.9 * t + 0.0012 * (1 - np.exp(-t / .01)))  # from 1.02 to 0.9 of the nominal pitch
        puff_colour = [(hz / 2, -20), (hz, 0), (hz * 2, -3), (hz * 5, -24)]
        puff = coloured(rng.standard_normal(len(t)), puff_colour)
        thump = np.sin(2 * np.pi * turns) + .4 * puff
        attack = 1 - np.exp(-t / 0.0011)
        out[round(s * SR):][:len(t)] += amp(db + 3.0 - 60 * t / t60) * attack * thump
    return out[:N]


def air():
    """Slow pressure swings at the microphone from the moving paper, in lumps."""
    level_db, = curves(AIR_LEVEL)
    lumps = amp(3.3 * wobble(8.9))
    return amp(level_db) * unit(lumps * coloured(rng.standard_normal(N), AIR_COLOUR))


def walls(x):
    """A short answer of the room, new for every quarter second; the lowest tones linger longest."""
    out, step = np.zeros(N + SR), SR // 4
    for start in range(0, N, step):
        hz, t, z = signal.stft(rng.standard_normal(step), SR, nperseg=256)
        decay = amp(-60 * t / along(ROOM_DECAY, hz)[:, None])
        tail = signal.istft(z * decay, SR, nperseg=256)[1]
        wet = signal.fftconvolve(x[start:start + step], tail / np.linalg.norm(tail))
        out[start + 150:][:len(wet)] += wet  # 150 samples (3.4 ms) late
    return out[:N]


def room_tone():
    """Ventilation hum and microphone hiss as one coloured noise, its level barely moving."""
    return amp(-48 + 0.65 * wobble(3.14)) * coloured(rng.standard_normal(N), ROOM_COLOUR)


def amp(db):
    """Gain of a level in dB."""
    return 10 ** (np.asarray(db) / 20)


def unit(x):
    """Each row brought to rms 1."""
    return x / np.sqrt(np.mean(x ** 2, axis=-1, keepdims=True) + 1e-20)


def along(points, hz):
    """(Hz, value) points read on a log frequency axis."""
    f, v = np.transpose(points)
    return np.interp(np.log(hz + 1), np.log(f + 1), v)


def curves(rows):
    """One value per sample for each column after the time."""
    s, *cols = np.transpose(rows)
    return [np.interp(np.arange(N) / SR, s, c) for c in cols]


def wobble(rate):
    """A smooth random curve, rate knots a second."""
    knots = rng.standard_normal(int(N * rate / SR) + 4)
    return map_coordinates(knots, [np.arange(N) * rate / SR])


def coloured(x, spectrum):
    """x given a (Hz, dB) spectrum, rms 1."""
    m = next_fast_len(x.shape[-1])
    gain = amp(along(spectrum, np.fft.rfftfreq(m, 1 / SR)))
    return unit(irfft(rfft(x, m) * gain, m)[..., :x.shape[-1]])


def scene():
    """One close microphone feeds both channels; only snaps and clacks excite the room."""
    knocks = snaps() + clacks()
    mono = slide() + knocks + taps() + air() + amp(-19.5) * walls(knocks) + room_tone()
    return np.array([mono, mono])


def record(dry):
    """Peaks flatten near full scale; then everything from the band limit up is removed."""
    flat = dry / (1 + np.abs(dry / .92) ** 8) ** (1 / 8)
    m = next_fast_len(N)
    passed = np.fft.rfftfreq(m, 1 / SR) < TOP_HZ
    return irfft(rfft(flat, m) * passed, m)[:, :N]


dry = scene()
out = record(dry)
generate_wav(out)
```